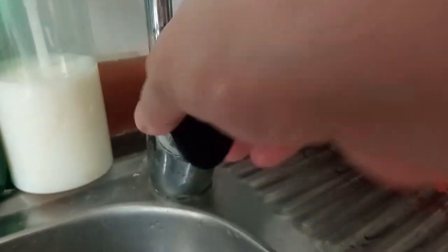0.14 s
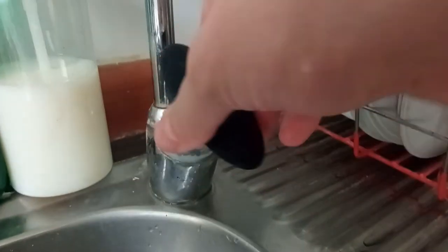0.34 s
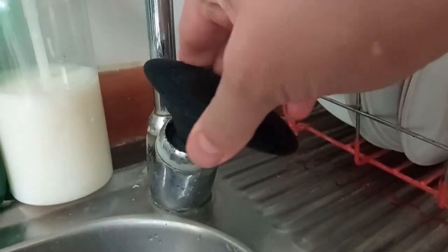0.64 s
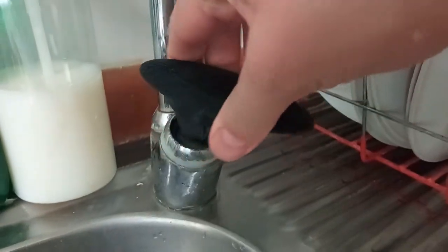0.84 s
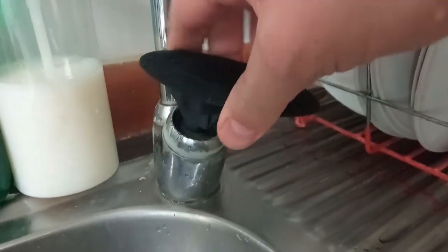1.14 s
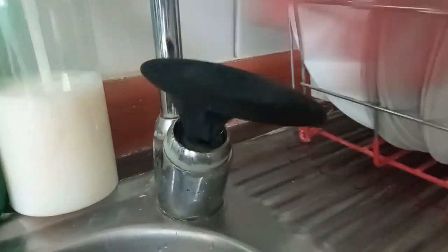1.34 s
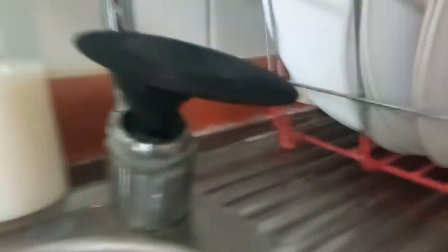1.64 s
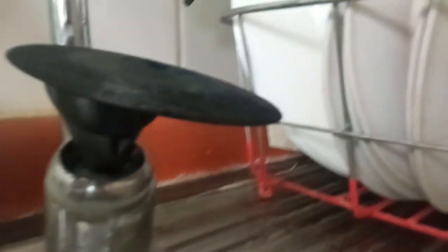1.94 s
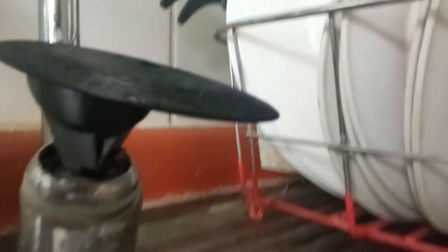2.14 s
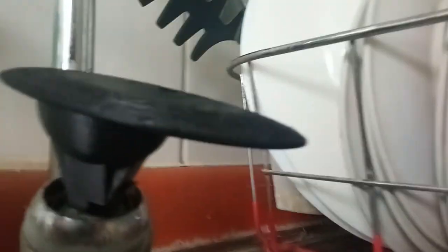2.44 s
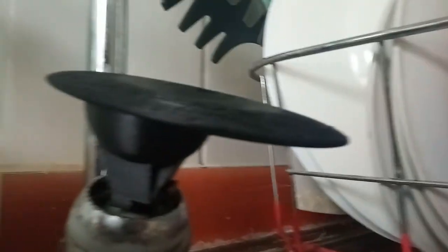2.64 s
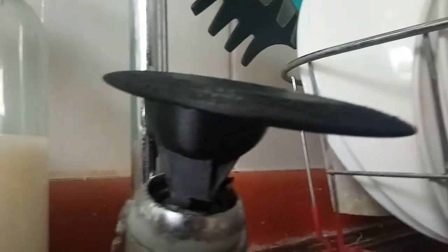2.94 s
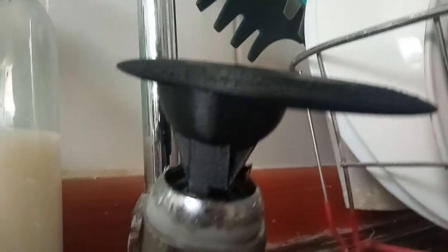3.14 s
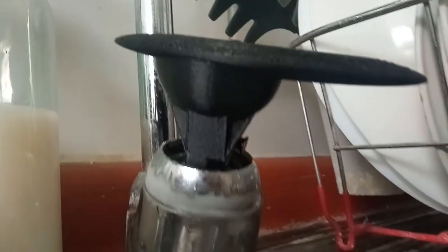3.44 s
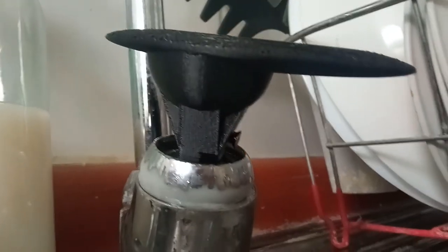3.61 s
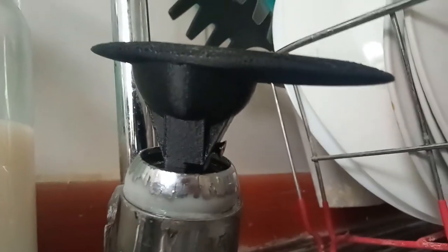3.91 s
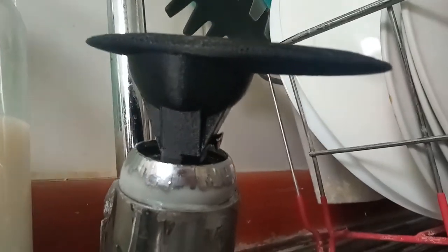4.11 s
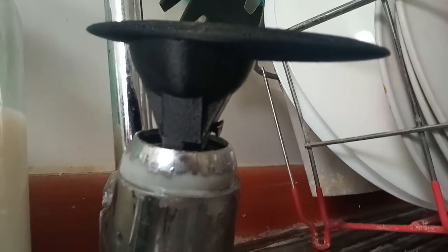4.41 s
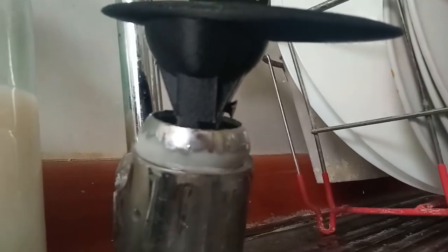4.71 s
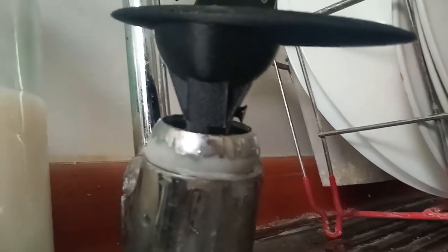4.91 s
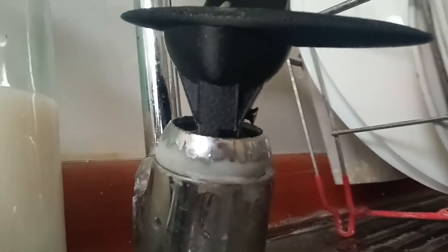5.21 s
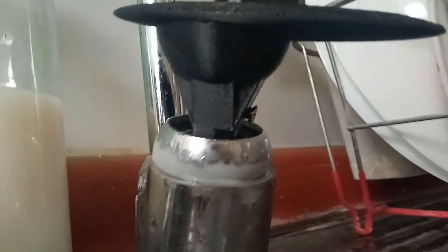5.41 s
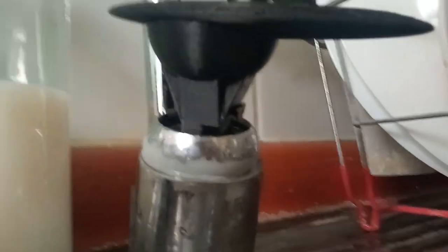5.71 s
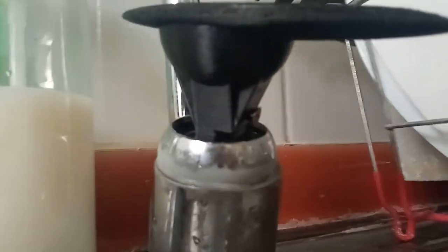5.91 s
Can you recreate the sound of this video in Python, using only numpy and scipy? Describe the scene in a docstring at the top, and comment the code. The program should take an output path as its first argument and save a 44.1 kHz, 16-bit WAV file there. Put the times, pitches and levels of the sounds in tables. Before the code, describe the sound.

Water trickles and gurgles down a metal sink drain, pauses under close handling knocks and rubbing, then drips in hollow plops before final handling bumps.

```python
"""Water trickles and drips in a drain pipe under a steel sink: bubbles and lumpy noise ring the air column,
which colours every drop; fine spray hisses, bright ticks sparkle and thin bands sing above.
The hand that holds the recorder shifts its grip: fingers slide over the case as patchy filtered noise,
and tap and knock it into short damped rings and clicks.
A quiet room lies behind: steady hiss with faint resonances and a lumpy low hum."""
import sys
import numpy as np
from scipy import signal
from scipy.fft import rfft, irfft, next_fast_len
from scipy.io import wavfile
from scipy.ndimage import uniform_filter1d, map_coordinates

SR = 44100
rng = np.random.default_rng(int(sys.argv[2]) if len(sys.argv) > 2 else 0)


def unload_audio(sound):
    """Save the sound as a 16-bit wav file, at the path given as the first command line argument."""
    columns = np.transpose(np.atleast_2d(sound))
    # keep every value between -1 and 1, then stretch to whole-number steps
    steps = np.round(np.clip(columns, -1, 1) * 32767)
    wavfile.write(sys.argv[1], SR, steps.astype(np.int16))


N = 266937

# Strength of the trickle while the tap feeds the pipe, then while it drains (one list each):
# t/s, gurgle in the lowest mode level/dB, bubbling drive level/dB (shaped further per band), spray level/dB
FLOW = [
    [(0.0, -66, -50.5, -71.5), (0.274, -62.5, -54.5, -71.5), (0.554, -56, -55, -78), (0.68, -80, -58, -77),
     (0.775, -57, -56, -75), (0.8, -53.5, -50, -79), (0.88, -57.5, -56, -88), (0.91, -60, -54.5, -87),
     (0.972, -48, -57.5, -71), (1.068, -58.5, -56, -99), (1.302, -58.5, -63.5, -77.5),
     (1.5, -62.5, -61, -90)],
    [(1.8, -67, -72, -85), (1.84, -53, -71, -94), (1.95, -54.5, -59.5, -82), (2.3, -55, -54, -102),
     (2.53, -56.5, -63.5, -64), (2.94, -57, -54, -64.5), (3.31, -54, -52, -63), (3.6, -61.5, -59, -68),
     (3.7, -65, -56.5, -78), (3.82, -67, -65, -74.5), (4.09, -63, -58, -99), (4.36, -63, -56.5, -75),
     (4.52, -56.5, -56.5, -101), (4.77, -74, -62, -86), (4.96, -73.5, -62, -85), (5.03, -64, -65, -82),
     (5.24, -79, -70, -89), (5.5, -76, -99.5, -73.5)],
]
# Resonances of the pipe's air column, fed and then draining (also ring the drops): f/Hz, width f/Hz, level/dB
PIPES = [
    [(135, 25, 3), (330, 70, -1), (620, 90, -12), (904, 45, 3), (1180, 46, -3), (1430, 53, 0),
     (1980, 55, -5), (2320, 140, -4), (3270, 73, -4), (3830, 220, -1), (4470, 35, -10), (4970, 80, -12),
     (5370, 84, -13), (6080, 170, -9), (6660, 140, -9), (7650, 110, -14), (9200, 130, -17)],
    [(225, 40, -7), (275, 36, 0), (330, 45, -4), (840, 32, -12), (975, 40, -7), (1130, 43, 0),
     (1410, 61, -10), (1700, 52, -1), (1840, 29, -2), (2230, 66, -12), (2580, 140, -14), (3100, 160, -13),
     (3500, 70, -9), (3860, 110, -12), (4400, 90, -11), (4670, 60, -16), (5070, 200, -15), (6200, 160, -19),
     (6800, 170, -21)],
]
# Lowest gurgle, fed and then draining: f/Hz
GURGLE_FROM_HZ = (68, 103)
# Lowest middle bubbling, fed and then draining: f/Hz
MIDDLE_FROM_HZ = (560, 1100)
# Colour of the spray: f/Hz, spectral level/dB
SPRAY_COLOUR = [(2650, -42), (4500, -9), (5220, -16.5), (6120, -11.5), (7730, -22), (8200, -25.5),
                (9460, -18.5), (13400, -52), (15000, -27), (16000, -28)]
MIDDLE_DB, HIGH_DB = -3, -9  # middle and high bubbling over the drive
MIDDLE_SWING = 1.58  # the middle swings wider than the drive, about -44.5 dB


def trickle():
    """Small bubbles and lumpy splashing drive the air column; fine spray hisses above."""
    middle = .4 * swarm(800, 2700, spread_db=2.5, cycles=14, count=2500) + gritty(45, 3)
    fine = .45 * swarm(2800, 7500, spread_db=2.8, cycles=30, count=3000) + gritty(45, 3)
    sources = (gritty(30, 3.2), patchy(middle, depth_db=3.5), patchy(fine, depth_db=4.5))

    fed = np.arange(N) < 2 * SR  # spatter only while the tap feeds the pipe
    spatter = 0.89 * fed * swarm(4500, 11000, spread_db=2.0, cycles=33, count=3500)
    spray = patchy(spatter + gritty(70, 2.5), depth_db=3.5)
    spray = unit(filtered(spray, lambda f: amp(along(SPRAY_COLOUR, f)) * band(4600, 16000)(f)))

    out = np.zeros(N)
    for rows, modes, low_hz, middle_hz in zip(FLOW, PIPES, GURGLE_FROM_HZ, MIDDLE_FROM_HZ):
        column = pipe(modes, leak_db=-27.0)
        parts = (band(low_hz, 406), band(middle_hz, 4250), band(1200, 7800))
        gurgle, bubbling, spray_gain = gains(rows)
        swing = (bubbling / amp(-44.5)) ** (MIDDLE_SWING - 1)
        levels = (gurgle, bubbling * swing * amp(MIDDLE_DB), bubbling * amp(HIGH_DB))
        for level, source, part in zip(levels, sources, parts):
            out += level * unit(filtered(source, lambda f: column(f) * part(f)))
        out += spray_gain * spray
    return out


# Drops, with drive levels that each layer offsets:
# t/s, large bubble level/dB, large bubble f/Hz, small bubble f/Hz, small bubble level/dB
DROPS = [(0.0228, -56, 1500, 6010, -39), (0.045, -64, 1500, 2860, -43), (0.068, -68, 1400, 3980, -44),
         (0.091, -63, 2190, 3890, -35.5), (0.125, -60, 2210, 3950, -41), (0.202, -68, 1430, 3770, -50),
         (0.282, -49.5, 1190, 3860, -40), (0.315, -42, 1335, 3890, -44), (0.383, -46, 1384, 3980, -46.5),
         (0.412, -60, 2400, 6760, -46), (0.477, -56, 2570, 4070, -39.5), (0.513, -66, 2190, 3740, -43),
         (0.582, -52, 1186, 3920, -51), (0.591, -63, 2290, 3630, -45.5), (0.634, -42.5, 2330, 3270, -42),
         (0.681, -46.5, 1520, 3780, -41.5), (0.706, -40, 1410, 3870, -45), (0.716, -62, 2320, 5910, -44),
         (0.78, -66, 2320, 4000, -49), (0.795, -41.5, 1690, 3690, -38), (0.813, -43, 1233, 3530, -71),
         (0.836, -39, 1396, 3250, -52), (0.867, -43.5, 1407, 6970, -53), (0.92, -49, 935, 3936, -40),
         (0.975, -49, 2030, 3670, -52), (1.009, -37.5, 894, 3840, -47), (1.019, -64, 1390, 6530, -49),
         (1.042, -41, 1390, 3930, -47), (1.057, -68, 2300, 6670, -54), (1.148, -63, 2370, 4550, -64),
         (1.167, -60, 1410, 3850, -59), (1.259, -58, 2220, 3750, -52), (1.317, -43, 1402, 4150, -49.5),
         (1.349, -50.5, 1850, 2820, -49.5), (2.708, -40, 1117, 2900, -56), (2.731, -54, 1135, 3150, -42),
         (2.746, -37, 845, 3580, -48), (2.787, -44, 1655, 4650, -57), (2.799, -44, 1100, 3880, -48),
         (2.859, -57, 2315, 3480, -45), (2.918, -29.5, 1698, 3580, -42.5), (2.938, -36.5, 1704, 3080, -53),
         (2.938, -38, 1112, 2670, -49), (2.961, -34, 1110, 3680, -41), (2.988, -41, 1770, 4300, -39.5),
         (2.978, -40.5, 984, 3260, -45), (3.004, -38, 2690, 4400, -43), (3.027, -45, 1730, 4310, -43),
         (3.089, -31.5, 1665, 3350, -63), (3.145, -33, 1140, 2970, -56), (3.158, -43, 1144, 2240, -66),
         (3.175, -41, 1703, 3060, -61), (3.2, -40, 1640, 2980, -45.5), (3.309, -33, 1118, 3600, -66),
         (3.3367, -24.5, 1774, 2260, -61), (3.34, -37.5, 1110, 4300, -69), (3.375, -36, 1110, 3840, -34.5),
         (3.392, -41, 1150, 3460, -59), (3.404, -35.5, 1100, 3460, -47), (3.379, -44, 2580, 3480, -50),
         (3.393, -41, 1870, 3010, -44), (3.411, -45, 1090, 2200, -57), (3.422, -45, 1100, 4370, -59),
         (3.428, -59, 1680, 3500, -47), (3.441, -35.5, 1110, 3750, -40), (3.447, -60, 1710, 3490, -43),
         (3.473, -29, 1112, 3470, -44.5), (3.555, -38, 1107, 3050, -87), (3.58, -39.5, 1735, 3090, -48),
         (3.637, -41.5, 1710, 3480, -81), (3.689, -47.5, 1424, 2820, -55), (3.787, -47, 2580, 3100, -43),
         (3.812, -46, 2620, 3440, -47.5), (3.856, -43.5, 1798, 2760, -74), (3.964, -40, 1664, 3600, -86),
         (3.978, -37.5, 1112, 3260, -81), (4.013, -35.5, 1794, 3850, -38), (4.068, -34.5, 1720, 2740, -55),
         (4.182, -40.5, 1657, 3530, -39), (4.235, -38, 1667, 3460, -48.5), (4.33, -46.5, 1780, 3270, -67),
         (4.401, -44, 1630, 6140, -49), (4.419, -49, 1300, 3485, -46.5), (4.42, -51, 2900, 5150, -46),
         (4.42, -66, 1690, 4480, -47), (4.435, -43, 1740, 3870, -42), (4.441, -38.5, 1116, 3480, -51),
         (4.436, -34.5, 1444, 4470, -45), (4.461, -46, 1384, 4380, -61), (4.518, -45, 1460, 5130, -57),
         (4.631, -38, 1113, 5100, -58), (4.711, -47, 2024, 4000, -53), (4.747, -46.5, 1824, 4430, -73),
         (4.821, -41, 1808, 3480, -57), (4.892, -51, 1845, 3470, -53), (4.94, -64, 2320, 5080, -54),
         (4.981, -39, 1690, 6240, -47.5), (5.014, -52, 2610, 3450, -53), (5.058, -45, 1830, 3450, -84),
         (5.165, -55, 2610, 2750, -51), (5.335, -85, 2225, 3500, -53.5), (5.338, -82, 2220, 4500, -51.5),
         (5.408, -66, 2760, 4400, -62)]
# Plop over the large bubble; it weakens as the bubble's pitch climbs past PLOP_FROM_HZ
PLOP_DB, PLOP_DB_PER_OCTAVE, PLOP_FROM_HZ = -7.5, -16.5, 1010
SPLASH_DB, SPLASH_T60_S = (13.5, 9), 0.05  # middle splash over the large bubble, high over the small
DRAIN_ECHO_DB, DRAIN_T60_S = -5, 0.12  # the drain smears every bubble into a short tail
TWIN_RATIO = 1.075  # nominal pitch step, up or down, from a bubble to its twin


def drops():
    """Each impact shakes the pipe, frees a large and a small bubble with lesser twins, and plops low down."""
    s, db, hz, small_hz, small_db = np.transpose(DROPS)
    count = len(s)
    large = bubbles(s, db - 6.0, hz, 0.011 + 45 / hz, rise=0.007, hold=1.61, swell=23.5)
    small = bubbles(s, small_db - 3.5, small_hz, 0.022 + 40 / small_hz, rise=0.011, hold=1.26, swell=44)
    twins = np.zeros(N)
    for level, pitch in ((db - 13, hz), (small_db - 7, small_hz)):
        twin_s = s + rng.uniform(0, 0.003, count)
        twin_db = level + rng.normal(0, 3.0, count)
        twin_hz = pitch * TWIN_RATIO ** rng.choice([-1, 1], count) * rng.normal(1, 0.016, count)
        twins += bubbles(twin_s, twin_db, twin_hz, 30 / pitch + .02, rise=0.0049)
    bubbling = large + small + twins

    plop_db = db + PLOP_DB + PLOP_DB_PER_OCTAVE * np.log2(hz / PLOP_FROM_HZ).clip(0)
    plop = bubbles(s, plop_db, rng.normal(269.2, 25.7, count), np.full(count, .12), rise=0.0038)

    t = np.arange(SR // 8) / SR
    fade = amp(-60 * t / SPLASH_T60_S) * (1 - np.exp(-t / 0.0012))
    splash = np.zeros(N)
    for level, over_db, part in zip((db, small_db), SPLASH_DB, (band(1270, 2460), band(2500, 7700))):
        landings = np.bincount(np.round(s * SR).astype(int), amp(level + over_db), N)
        burst = signal.fftconvolve(landings, fade)[:N] * rng.standard_normal(N)
        splash += filtered(burst, lambda f: part(f) ** 2)

    fed = np.arange(N) < 2 * SR
    rung = np.zeros(N)
    for when, modes in zip((fed, ~fed), PIPES):
        rung += filtered((bubbling + splash) * when, pipe(modes, leak_db=-48))

    flutter = amp(0.16 * wobble(230))  # the surface heaves under the ringing bubbles
    tail = fade ** (SPLASH_T60_S / DRAIN_T60_S) * rng.standard_normal(len(t))
    echo = signal.fftconvolve(bubbling, tail / np.linalg.norm(tail))[:N]
    return (large + small) * flutter + twins + amp(1.5) * rung + plop + amp(DRAIN_ECHO_DB) * echo


# Tiny bright ticks, drive levels: t/s, level/dB, centre f/Hz
TICKS = [(0.0285, -51, 9400), (0.08, -63, 9200), (0.132, -62, 9150), (0.21, -60, 9300), (0.235, -61, 8600),
         (0.27, -67, 10300), (0.302, -63, 9100), (0.34, -62, 12200), (0.413, -70, 7540), (0.534, -63, 7700),
         (0.586, -73, 10900), (0.671, -59, 9400), (0.712, -57, 7900), (0.764, -61, 7650),
         (0.797, -66, 11000), (0.78, -68, 9200), (0.868, -66, 8600), (1.016, -68, 10200), (1.45, -67, 9800),
         (1.865, -56, 8000), (0.166, -52.5, 9100), (0.221, -57, 9400), (.2574, -62, 11700),
         (.3177, -56, 8800), (0.471, -53, 7040), (0.636, -59, 7560), (0.688, -64, 7560),
         (0.9214, -55, 6430), (.9577, -62, 7130), (1.057, -60, 11600), (1.198, -66, 8300),
         (1.26, -58, 7650), (1.302, -58, 6860), (3.1503, -57, 10800), (3.902, -63, 8400),
         (4.17, -53.5, 8640), (4.402, -79, 6100), (4.435, -71, 6450), (4.979, -63, 6300),
         (5.284, -65.5, 5740), (5.336, -75, 5100), (5.129, -58.5, 8640)]


def ticks():
    """Specks of spray burst: each a puff of bright noise and a cluster of very short notes."""
    s, db, hz = np.transpose(TICKS)
    t = np.arange(SR // 16) / SR
    fade = amp(-60 * t / 0.049) * (1 - np.exp(-t / 0.0019))
    bursts = np.bincount(np.round(s * SR).astype(int), amp(db + 0.5), N)
    puffs = signal.fftconvolve(bursts, fade)[:N] * rng.standard_normal(N)
    out = filtered(puffs, band(3700, 9600))
    for ratio, loss_db in ((1, -1), (0.29, -7), (0.9, -4)):
        note_s = s + rng.uniform(0, 0.004, len(s))
        note_hz = hz * ratio * rng.normal(1, 0.028, len(s))
        out += bubbles(note_s, db + loss_db, note_hz, 160 / hz, rise=0.009)
    return out


# Narrow bands that swell, drift in pitch and fade:
# from t/s, to t/s, first f/Hz, last f/Hz, rate of wavering f/Hz, level/dB
WHISTLES = [(2.5, 2.95, 4480, 4750, 60, -70), (2.52, 2.75, 8900, 9150, 60, -79),
            (2.62, 2.85, 7500, 7600, 45, -78), (2.58, 2.95, 6720, 6650, 50, -78),
            (2.55, 2.9, 5670, 5580, 55, -79), (2.95, 3.4, 5950, 6050, 60, -74),
            (3.05, 3.6, 6250, 6480, 70, -74), (3.0, 3.6, 9700, 9200, 200, -81),
            (4.05, 4.95, 5100, 4950, 420, -75), (4.18, 4.38, 7550, 6550, 200, -82),
            (3.75, 4.0, 4480, 4440, 90, -87), (5.35, 5.49, 7900, 10400, 260, -82),
            (3.28, 3.52, 1125, 1120, 50, -58), (3.28, 3.55, 985, 975, 45, -67),
            (3.12, 3.25, 1140, 1150, 55, -65), (3.95, 4.15, 980, 975, 45, -74),
            (4.15, 4.7, 9700, 9500, 350, -88), (2.85, 3.3, 840, 800, 150, -73),
            (4.45, 4.72, 272, 275, 20, -59), (2.5, 2.62, 3100, 3100, 70, -65),
            (5.15, 5.45, 2750, 2850, 70, -76), (4.88, 5.2, 3480, 3480, 70, -77)]


def whistles():
    """Thin, wavering bands sing in the pipe as the water film drains."""
    t, out = np.arange(N) / SR, np.zeros(N)
    for start, end, first_hz, last_hz, width_hz, db in WHISTLES:
        phase = 2 * np.pi * np.cumsum(np.interp(t, [start, end], [first_hz, last_hz])) / SR
        arch = np.sin(np.pi * np.interp(t, [start, end], [0, 1])).clip(0)
        swell = np.sqrt(arch) * ((t > start) & (t < end))
        out += amp(db) * swell * (wobble(width_hz) * np.sin(phase) + wobble(width_hz) * np.cos(phase))
    return out


# Knocks on the case, drive levels: t/s, click level/dB, thump level/dB, thump base f/Hz, shell level/dB
KNOCKS = [(0.0924, -43, -33.5, 267, -33), (0.0954, -55, -42, 255, -33.5), (0.1, -50, -36, 111, -33.5),
          (0.1151, -39, -34.5, 134, -36.5), (0.961, -50, -44.5, 312, -52), (0.896, -65, -47, 189, -54),
          (1.012, -48, -36.5, 164, -37.5), (1.6619, -34, -58, 370, -53), (1.6659, -12.5, -37, 380, -15),
          (1.669, -30, -62, 367, -24.5), (1.676, -41, -57, 373, -38), (1.7578, -60, -73, 368, -37),
          (1.76, -60, -76, 370, -41), (1.942, -47, -45.5, 274, -53), (1.958, -25, -37, 436, -28),
          (2.0, -29, -70, 306, -54), (2.0062, -18.5, -47, 306, -48), (2.0565, -21.5, -57, 457, -26.5),
          (2.0896, -50, -33, 240, -55), (2.1021, -25, -32, 427, -26.5), (2.1677, -47, -39, 328, -40),
          (2.1916, -17, -32, 470, -41), (2.195, -48, -31, 377, -27.5), (2.2125, -23, -25, 340, -22.5),
          (2.377, -41, -36, 117.6, -32.5), (2.476, -55, -36.5, 223, -49), (3.7798, -31.5, -40, 240, -35.5),
          (4.061, -41, -47, 106, -76), (4.239, -32, -51.5, 290, -60), (5.5022, -60, -46, 300, -56.5),
          (5.5201, -8.5, -28.5, 330, -32.5), (5.532, -63, -44, 225, -40), (5.578, -36, -48, 290, -58),
          (5.628, -65, -40.5, 426, -50), (5.632, -65, -45, 390, -58), (5.686, -42, -95, 390, -42.5),
          (5.6978, -43, -55, 353, -46), (5.712, -55, -47, 330, -46), (5.724, -37, -69, 304, -42),
          (5.7632, -60, -80, 360, -36.5), (5.8045, -59, -76, 377, -37.5), (5.914, -48, -47, 393, -43)]
# Modes of the low thump: multiple of the base f, level/dB, free t60 t/s (shortened by the grip)
THUMP = [(.5, 1.5, 0.049), (1, 9, 0.043), (1.5, 3.5, 0.032)]
# Modes of the shell: nominal f/Hz, level/dB, free t60 t/s
SHELL = [(400, -5.5, 0.026), (640, -4, 0.026), (890, 3, 0.03), (1200, -3, 0.022)]
# Modes of the hard rim that clicks: nominal f/Hz, level/dB, free t60 t/s
EDGE = [(1960, 11, 0.0038), (2720, -1.5, 0.0054), (4000, -15.5, 0.0011)]
# Brightest modes, woken by hard blows: nominal f/Hz, level/dB, free t60 t/s
CRACK = [(4200, 3.5, 0.0098), (6560, 10, 0.013), (9640, -0.5, 0.005), (15200, -3.5, 0.006)]
DAMPING = 0.35  # the grip's factor on every mode's t60
SNAP_DB, SNAP_GROWS = -58.5, 2.17  # base snap level, and dB gained per dB of blow
SCATTER_DB, DETUNE = 2, .03  # random spread of mode level, and of pitch as a ratio


def knocks():
    """A blow sets off a click, crack and snap, the shell's ring and rattle, and a thump; the grip damps modes."""
    t = np.arange(SR // 6) / SR

    def ring(modes, scale):
        """Decaying sines with a soft start, a little different at every blow."""
        total = np.zeros(len(t))
        for hz, db, t60 in modes:
            decay = amp(db + rng.normal(0, SCATTER_DB) - 60 * t / (t60 * DAMPING))
            total += decay * np.sin(2 * np.pi * hz * scale * rng.normal(1, DETUNE) * t)
        return total * (1 - np.exp(-t / 0.00037))

    def burst(db, t60):
        """Noise that dies away at once."""
        return amp(db - 60 * t / t60) * rng.standard_normal(len(t))

    body, rattle, click, snap = np.zeros((4, N + SR))
    for s, click_db, thump_db, thump_hz, shell_db in KNOCKS:
        start = round(s * SR)
        span = slice(start, start + len(t))
        blow_db = 0.68 * click_db + 0.29 * shell_db + 27.0
        snap_db = SNAP_DB + SNAP_GROWS * blow_db
        body[span] += amp(thump_db) * ring(THUMP, thump_hz) * (1 - np.exp(-t / 0.0006))
        body[span] += amp(shell_db) * ring(SHELL, 0.96)
        body[span] += amp(click_db) * ring(EDGE, 1)
        body[span] += amp(snap_db) * ring(CRACK, 0.98)
        rattle[span] += burst(shell_db + 5.0, 0.032)
        click[span] += burst(click_db - 10.5, 0.01)
        snap[span] += burst(snap_db, 0.014)
    out = body[:N] + filtered(rattle[:N], band(290.0, 1800))
    return out + filtered(click[:N], band(2300, 4220)) + filtered(snap[:N], band(5300, 11000))


# Spells when the hand works on the case: from t/s, to t/s, rustle reference level/dB
GRIPS = [(1.5, 2.53, -69), (5.5, 6.1, -70)]
# Drag, low, middle and high scuff and hiss of the rustle over its reference: level/dB
RUSTLE_DB = [1.5, -2, -2.5, -8.5, -4.5]
# Single strokes of a finger: from t/s, top t/s, to t/s, then drag, low, middle and high scuff, hiss level/dB
STROKES = [(-.05, 0, 0.05, -59.5, -54.5, -68, -63, -63.5), (0.077, 0.09, .19, -53, -55, -57, -72, -87),
           (1.017, 1.002, 1.07, -61.5, -67, -82, -64, -90), (1.469, 1.508, 1.61, -55, -62, -62, -83, -82),
           (1.508, 1.543, 1.557, -54, -52.5, -48, -56, -50.5),
           (1.574, 1.585, 1.66, -56.5, -63, -54.5, -65, -59.5),
           (1.66, 1.688, 1.712, -46.5, -50.5, -55, -70, -55),
           (1.694, 1.72, 1.773, -60, -55.5, -54, -52.5, -50.5),
           (1.718, 1.777, 1.795, -56.5, -53, -48, -47.5, -57),
           (1.792, 1.8, 1.866, -63, -62.5, -62, -63.5, -57.5),
           (1.882, 1.95, 1.97, -65, -62.5, -67, -70, -64), (1.98, 2.034, 2.09, -51, -57, -56, -64, -61.5),
           (2.069, 2.094, 2.12, -47, -49, -47.5, -45.5, -45), (2.092, 2.12, 2.19, -53, -53, -58, -66, -83),
           (2.164, 2.187, 2.19, -62, -57, -59, -65, -54), (2.183, 2.23, 2.31, -46.5, -62, -50, -59, -62.5),
           (2.25, 2.31, 2.32, -46, -45, -50, -49, -59), (2.304, 2.348, 2.368, -50.5, -50, -52, -52, -60),
           (2.36, 2.42, 2.59, -52.5, -54.5, -54, -64, -70), (2.43, 2.478, 2.57, -61, -50, -51, -57, -78),
           (2.468, 2.479, 2.535, -48, -41, -47, -46, -50.5), (5.485, 5.504, 5.54, -61, -76, -64, -60, -61),
           (5.514, 5.608, 5.6, -58, -66, -71, -67, -70.5), (5.59, 5.69, 5.74, -66, -85, -83, -80, -69.5),
           (5.719, 5.747, 5.82, -46, -56, -55, -58, -67), (5.748, 5.786, 5.77, -62, -54, -54, -49, -57.5),
           (5.76, 5.819, 5.865, -55.5, -55.5, -56, -45.5, -59),
           (5.836, 5.887, 5.95, -51.5, -61, -58, -59, -67),
           (5.886, 5.984, 6, -71, -57.5, -57, -61.5, -57.5),
           (5.947, 6.024, 6.07, -60.5, -57, -53.5, -60, -60.5)]
# Colour of skin on the case: f/Hz, spectral level/dB
SCUFF = [(88, -33.5), (150, 14.5), (259, 10.5), (494, -1), (854, 0.5), (1690, -4.5), (1830, -5),
         (3620, -5.5), (5250, -12.5), (6260, -13), (10000, -22.5), (13400, -36), (16000, -23)]
GRIP_FADE_S, STROKE_FULLNESS = 0.012, 0.87  # a small fullness gives strokes blunt ends


def fingers():
    """Skin drags over the case: sticky slips in the bass, a patchy scuff and hiss above."""
    t = np.arange(N) / SR
    held = np.zeros(N)
    for start, end, db in GRIPS:
        held += amp(db) * np.interp(t, [start - GRIP_FADE_S, start, end, end + GRIP_FADE_S], [0, 1, 1, 0])
    pressure = amp(RUSTLE_DB)[:, None] * held
    for start, top, end, *layer_db in STROKES:
        stroke = np.sin(np.pi / 2 * np.interp(t, [start, top, end], [0, 1, 0])) ** STROKE_FULLNESS
        pressure = np.hypot(pressure, amp(layer_db)[:, None] * stroke)

    # drag, low, middle and high scuff, hiss: band, lumps per second, grit in dB
    layers = ((band(232, 1120), 110, 3.5), (band(860, 2120), 190, 2.2), (band(1800, 3120), 200, 1.8),
              (band(2850, 4100), 200, 1.5), (band(3920, 20000), 200, 1.5))
    out = np.zeros(N)
    for gain, (part, rate, grit_db) in zip(pressure, layers):
        skin = patchy(gritty(rate, grit_db), depth_db=1.5)
        out += gain * unit(filtered(skin, lambda f: amp(along(SCUFF, f)) * part(f) ** 2))
    return out


# Colour of the room's hiss and hum: f/Hz, spectral level/dB
ROOM = [(15, -84), (25, -25), (64, -35), (92, -14), (145, -13.5), (1560, -10), (2000, 9.5), (2760, 1),
        (3250, 1), (3620, -47), (4140, -95), (4490, -13), (7510, -37.5), (8590, -79.5), (16000, -129)]
# Resonances that colour the steady hiss: f/Hz, width f/Hz, level/dB
BASIN = [(2080, 12, 0), (2267, 9.9, 19.5), (2540, 15, -10.5), (2860, 31, 1), (3480, 55, -3),
         (4240, 120, -9.5), (5140, 87, -34)]
# Swell of the low hum: t/s, level/dB
HUM = [(0.0, -86), (0.13, -36), (0.23, -65), (0.99, -51.5), (1.65, -51), (1.67, -45), (1.77, -67),
       (2.07, -55), (2.49, -48.5), (2.61, -75), (2.85, -53.5), (4.53, -67), (4.63, -53), (4.92, -70.5),
       (5.46, -64.5), (5.53, -53), (5.56, -50), (5.64, -59), (5.75, -65), (6.05, -65)]
ROOM_DB = -65.5  # hiss level


def room():
    """Steady hiss with faint resonances, and a lumpy low hum."""
    colour = lambda f: amp(along(ROOM, f))
    basin = pipe(BASIN, leak_db=2.0)
    hiss = filtered(gritty(5.8, 1.0), lambda f: colour(f) * np.abs(basin(f)) * band(170, 17000)(f))
    hum = filtered(gritty(11.0, 3.5), lambda f: colour(f) / (1 + (f / 140) ** 6))
    return amp(ROOM_DB) * unit(hiss) + gains(HUM)[0] * unit(hum)


def bubbles(s, db, hz, life_s, rise, hold=1.074, swell=55):
    """Soft-started notes that rise in pitch as they die, 60 dB down at life_s; a large hold delays the fall."""
    t = np.arange(int(SR * np.max(life_s))) / SR
    s, db, hz, life_s = (np.asarray(v)[:, None] for v in (s, db, hz, life_s))
    age = t / life_s
    envelope = amp(db - 60 * age ** hold) * (1 - np.exp(-swell * age)) ** 2
    notes = envelope * np.sin(2 * np.pi * hz * t * (1 + rise * age))
    at = np.round(s * SR).astype(int) + np.arange(len(t))
    return np.bincount(at.ravel(), notes.ravel(), N + SR)[:N]


def swarm(lo_hz, hi_hz, spread_db, cycles, count):
    """Many small bubbles at random moments, pitches and levels."""
    when, high, luck = rng.random((count, 3)).T
    hz = lo_hz * (hi_hz / lo_hz) ** high
    db = -spread_db * np.log(luck + 0.0099)  # a few stand out
    return unit(bubbles(when * N / SR, db, hz, cycles / hz + .008, rise=.012))


def pipe(modes, leak_db):
    """Causal sum of resonances of alternating sign, with some sound passing straight through."""
    def response(f):
        total = amp(leak_db)
        for k, (hz, width, db) in enumerate(modes):
            total = total + (-1) ** k * amp(db) * 1j * f * width / (hz * hz - f * f + 1j * f * width)
        return total
    return response


def gritty(rate, grit_db):
    """Noise whose strength swings in short random lumps."""
    return unit(amp(grit_db * wobble(rate)) * rng.standard_normal(N))


def patchy(x, depth_db):
    """x with random patches of gain in time and frequency."""
    z = signal.stft(x, nperseg=512)[2]
    field = uniform_filter1d(rng.standard_normal(z.shape), size=5, axis=0)
    field = uniform_filter1d(field, size=5, axis=1)
    return signal.istft(z * amp(depth_db * unit(field)), nperseg=512)[1][:N]


def wobble(rate):
    """A smooth random curve, rate knots a second."""
    return map_coordinates(rng.standard_normal(int(N * rate / SR) + 4), [np.arange(N) * rate / SR])


def filtered(x, response):
    """x shaped by a complex response of frequency."""
    m = next_fast_len(N + SR // 2)
    return irfft(rfft(x, m) * response(np.fft.rfftfreq(m, 1 / SR)), m)[..., :N]


def band(lo_hz, hi_hz):
    """A soft-edged pass band."""
    return lambda f: (f / lo_hz) ** 4 / (1 + (f / lo_hz) ** 4) / (1 + (f / hi_hz) ** 6)


def along(points, hz):
    """Reads (f/Hz, value) points on a log frequency axis."""
    f, v = np.transpose(points)
    return np.interp(np.log(hz + 1), np.log(f + 1), v)


def gains(rows):
    """One gain curve for each level column, all but silent (-140 dB) outside the table."""
    s, *columns = np.transpose(rows)
    return [amp(np.interp(np.arange(N) / SR, s, c, left=-140, right=-140)) for c in columns]


def amp(db):
    """Decibels to amplitude."""
    return 10 ** (np.asarray(db) / 20)


def unit(x):
    """x scaled to an RMS of one."""
    return x / np.sqrt(np.mean(x ** 2) + 1e-20)


def scene():
    """Water in front, the hand on the case, the room behind."""
    water = trickle() + drops() + ticks() + whistles()
    return (water + knocks() + fingers() + room())[None]


TOP_HZ = 15830  # the microphone's band limit


def record(dry):
    """The microphone drops the deep bass, adds faint self-noise and keeps nothing above its band limit."""
    bass_cut = lambda hz: (1j * hz / 80 / (1 + 1j * hz / 80)) ** 4
    self_noise = filtered(rng.standard_normal(N), lambda hz: amp(-92.5) * (1 + 1500 / (hz + 60)))
    return filtered(filtered(dry, bass_cut) + self_noise, lambda hz: hz < TOP_HZ)


dry = scene()
out = record(dry)
unload_audio(out)
```